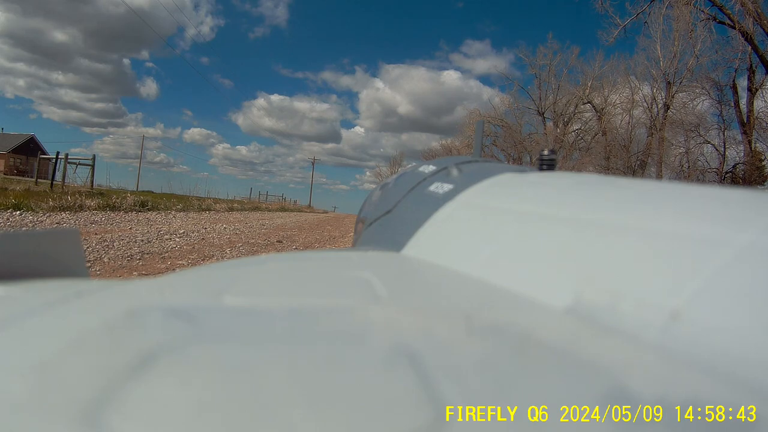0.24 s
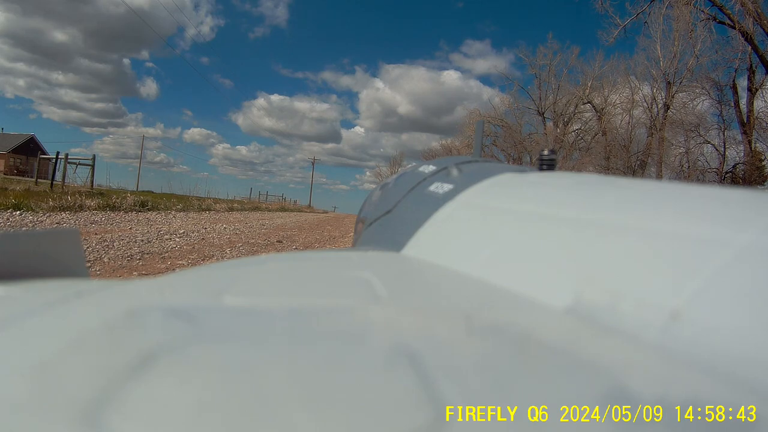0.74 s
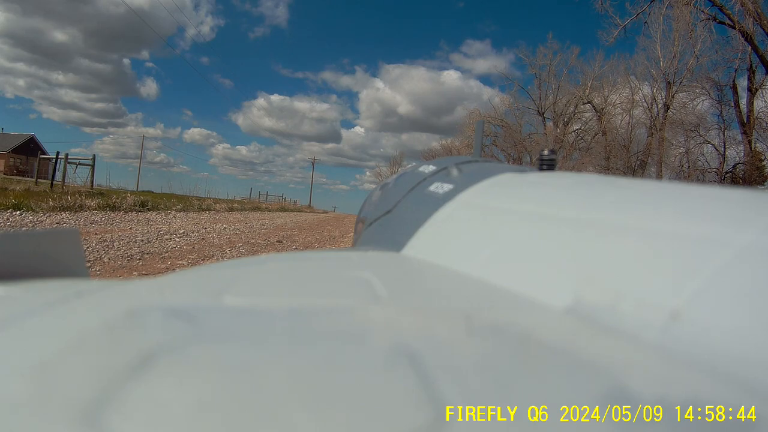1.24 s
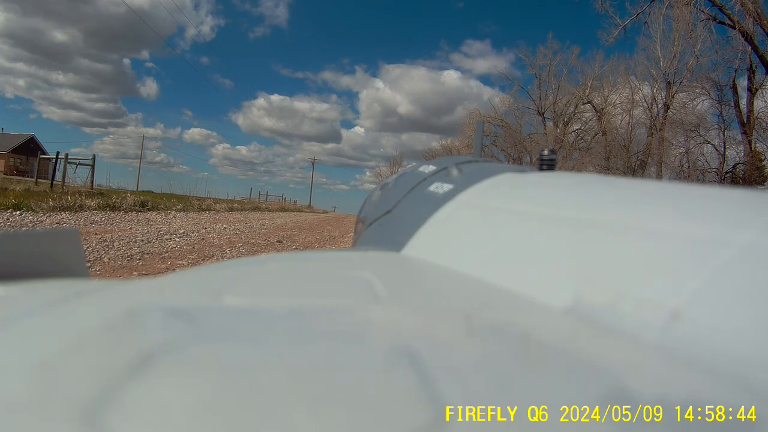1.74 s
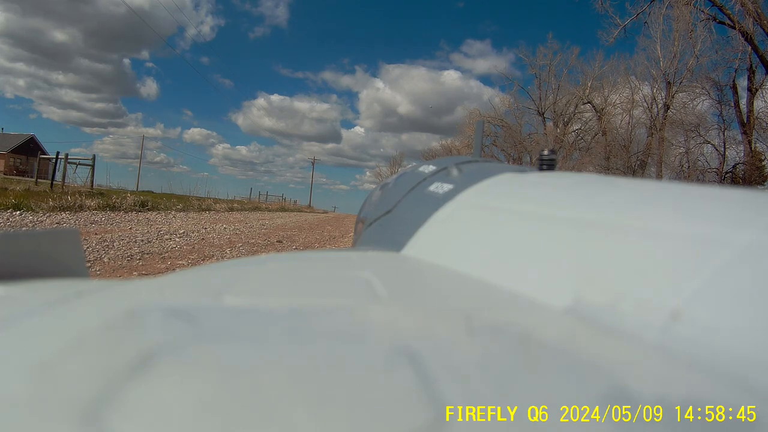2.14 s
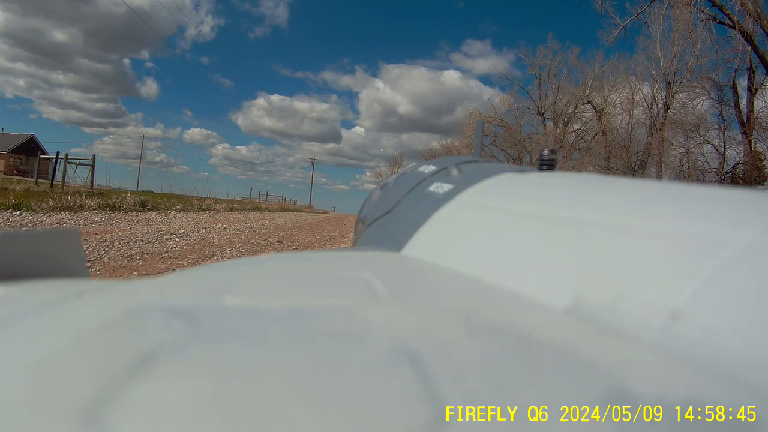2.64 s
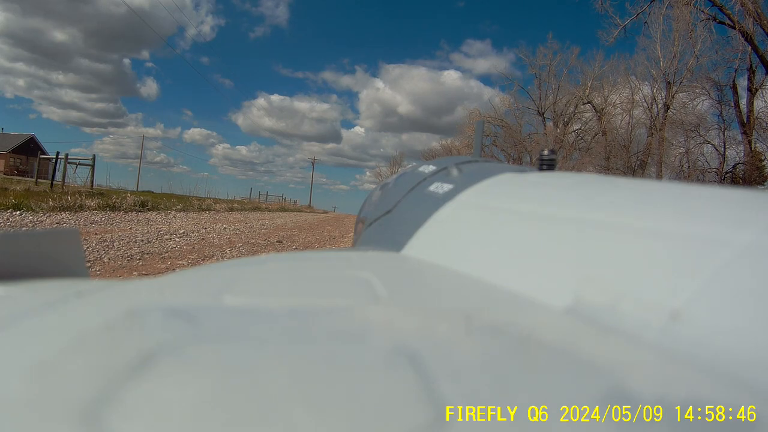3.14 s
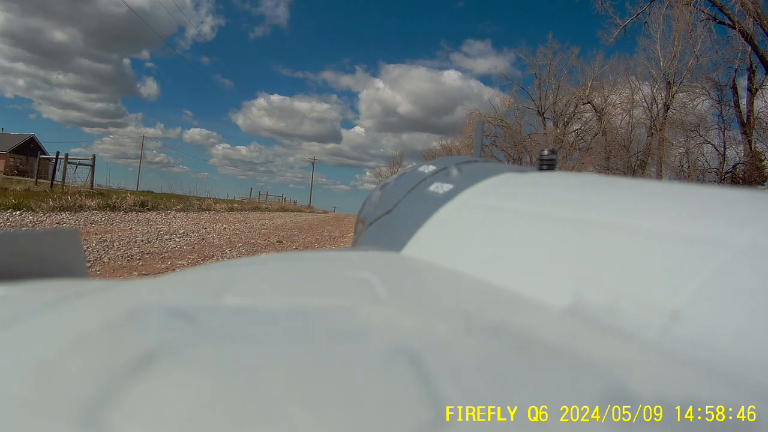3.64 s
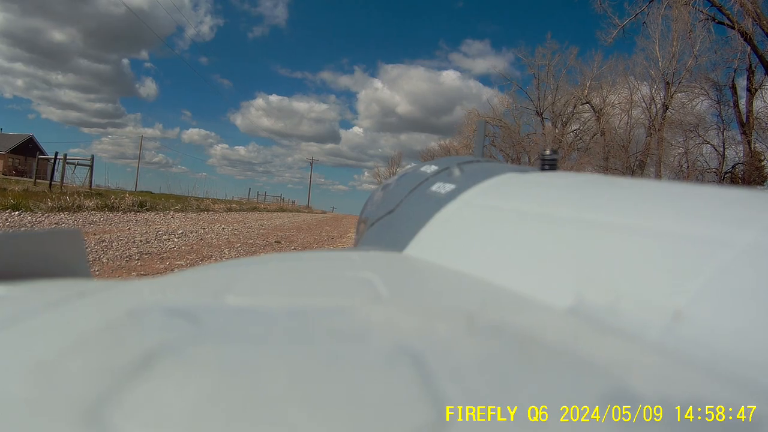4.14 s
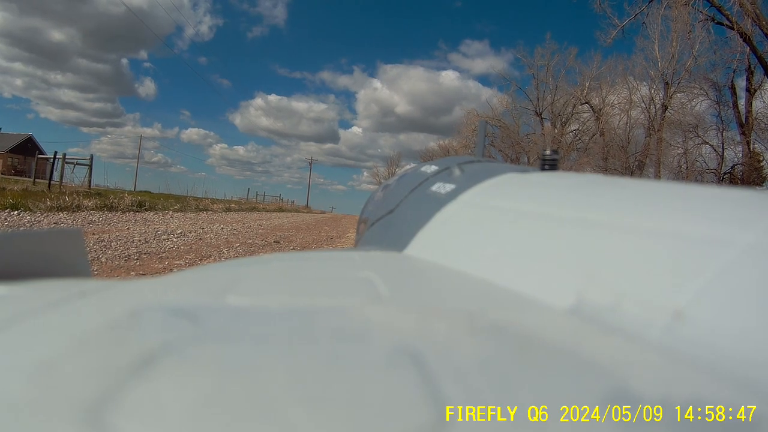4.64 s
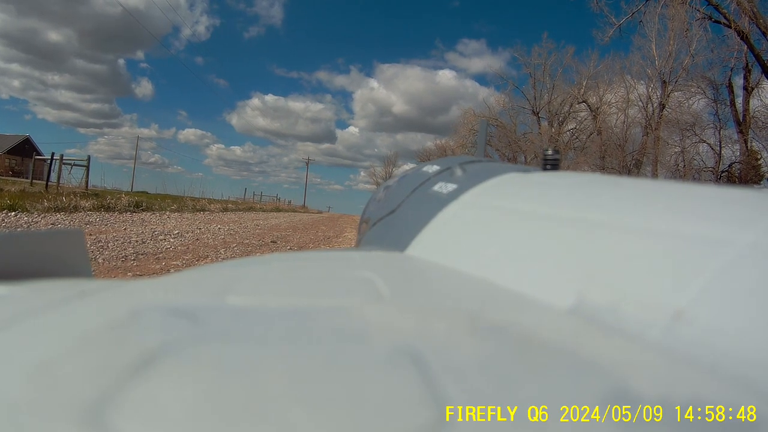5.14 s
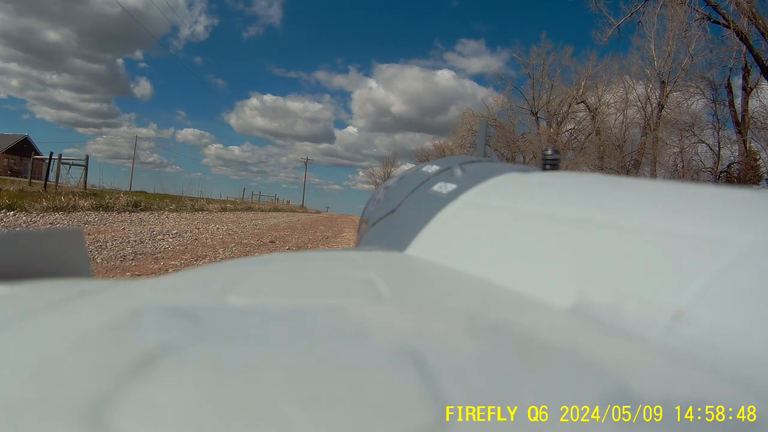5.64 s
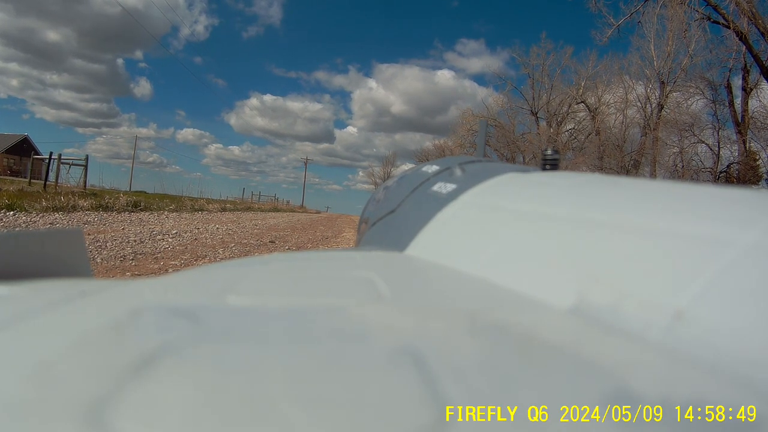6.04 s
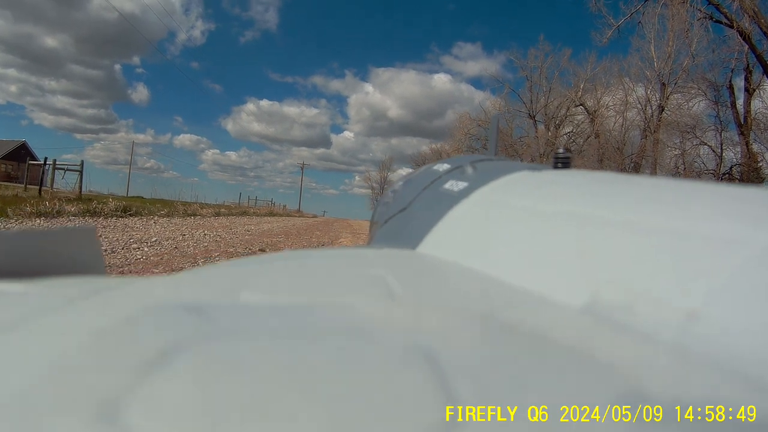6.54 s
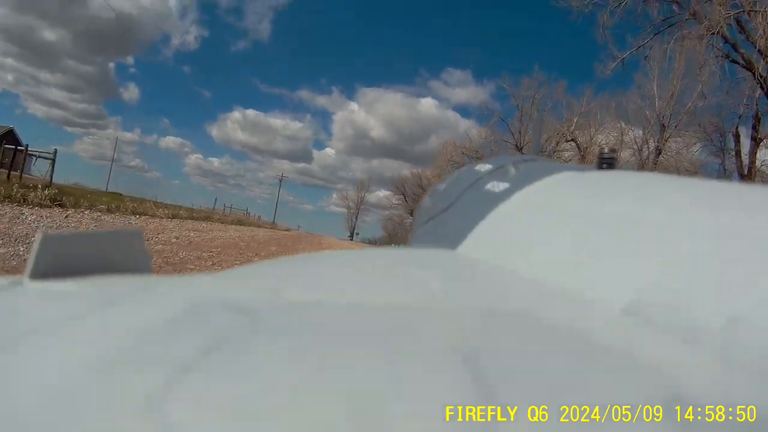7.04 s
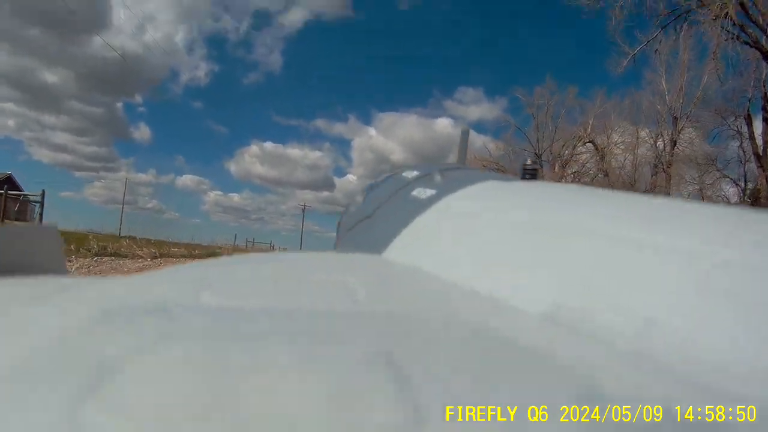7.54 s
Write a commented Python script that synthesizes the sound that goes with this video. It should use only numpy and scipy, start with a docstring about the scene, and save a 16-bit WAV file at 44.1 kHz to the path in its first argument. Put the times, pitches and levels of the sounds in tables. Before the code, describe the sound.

From 0 to 4 s there is only a very faint steady breeze and distant birds: weak rasping calls early, a soft rustle at 0.75 s, gliding whistles from 1.5 s, a quick slowing trill around 2.6-3 s, and two harsh chirps near 3.6 and 3.8 s. At 4.1-4.5 s small servos buzz in short gritty bursts. At 4.46 s twitches become a rapid stutter of hard knocks ringing in the airframe, and an electric fan spools up in about half a second. It holds a buzzy, hollow idle whine with airflow until 5.9 s, edges up, then surges from 6.2 to a loud shrill roar near 6.5 s. It drops to a hoarse part-throttle whine as wheels rumble, tick and jolt on gravel from 6.7 s, the close microphone squashing peaks. From 7.7 s the pitch falls, cut off still rolling.

```python
"""A gravel road among trees, with the camera's microphone riding on a model jet's fuselage.
Birds sing in gliding whistles and noisy chucks, with one soft rustle; servos rasp in short bursts of gear teeth.
Knocks ringing in the airframe start the brushless motor. Motor and twelve-blade fan tones follow one shaft
speed as the jet spools up, idles and goes to full throttle, with noise for the air in the duct.
It rolls off at part throttle on rumble, ticks and jolts that push the gain down and round off the peaks."""
import sys
import numpy as np
from scipy import signal
from scipy.fft import rfft, irfft, next_fast_len
from scipy.io import wavfile
from scipy.ndimage import uniform_filter1d, map_coordinates

SR = 44100
rng = np.random.default_rng(int(sys.argv[2]) if len(sys.argv) > 2 else 0)


def to_wav(s):
    """Save 16-bit WAV."""
    ch = np.atleast_2d(s).T  # columns
    pcm = np.round(np.clip(ch, -1, 1) * 32767)  # PCM
    wavfile.write(sys.argv[1], SR, pcm.astype(np.int16))


N = 343980


def amp(db):
    """Decibels to gain."""
    return 10 ** (np.asarray(db) / 20)


def unit(x):
    """Scale to rms 1."""
    return x / np.sqrt(np.mean(x ** 2) + 1e-20)


def curves(rows):
    """One value per sample for each column after the time."""
    s, *cols = np.transpose(rows)
    return [np.interp(np.arange(N) / SR, s, c) for c in cols]


def fade_in(start, length):
    """A straight ramp from 0 to 1, start and length in seconds."""
    return np.clip((np.arange(N) / SR - start) / length, 0, 1)


def wobble(rate):
    """A smooth random curve with rate knots a second."""
    knots = rng.standard_normal(int(N * rate / SR) + 4)
    return map_coordinates(knots, [np.arange(N) * rate / SR])


def filtered(x, response):
    """x times a response of frequency."""
    size = next_fast_len(len(x) + 8192)
    return irfft(rfft(x, size) * response(np.fft.rfftfreq(size, 1 / SR)), size)[:len(x)]


def coloured(x, spectrum):
    """x shaped by (Hz, dB) points on a log axis."""
    f, db = np.transpose(spectrum)
    return filtered(x, lambda hz: amp(np.interp(np.log(hz + 1), np.log(f), db)))


def noise(spectrum):
    """Coloured noise of rms 1."""
    return unit(coloured(rng.standard_normal(N), spectrum))


def add(track, s, sound):
    """Mix a sound into a track at time s."""
    start = max(round(s * SR), 0)
    track[start:start + len(sound)] += sound[:max(N - start, 0)]


def boost(hz, resonances):
    """Lift in dB from a set of (Hz, width Hz, dB) resonances."""
    return sum(db / (1 + (2 * (hz - c) / w) ** 2) for c, w, db in resonances)


def tone(cycles, flutter_db, rough):
    """A line of about rms 1, its strength (dB) and phase (radians) shaken at random."""
    strength = np.sqrt(2) * amp(flutter_db * wobble(22))
    return strength * np.sin(2 * np.pi * cycles + rough * wobble(160))


def octaves(speed):
    """Shaft speed in octaves above 500 turns a second, the part-throttle speed."""
    return np.log2(np.maximum(speed, 20) / 500)


def shaft():
    """Shaft speed in turns a second: the rotor lags behind each move of the throttle."""
    # Each row: start in seconds, speed aimed at in turns a second, lag in seconds,
    # ease (about 1 = stick snapped, 2 to 3 = pushed smoothly).
    throttle = [(4.525, 279.6, .133, .854), (5.94, 323.6, .166, 1.04), (6.199, 675.2, .123, 2.62),
                (6.635, 471.8, .151, 2.73), (7.062, 520.8, .098, 2), (7.313, 509.2, .069, 2),
                (7.674, 213, .164, .96)]
    t, speed = np.arange(N) / SR, np.zeros(N)
    for s, aim, lag, ease in throttle:
        progress = 1 - np.exp(-(np.maximum(t - s, 0) / lag) ** ease)
        speed += (aim - speed) * progress
    return speed


def fan(turns, speed, load):
    """Unbalance hums once a turn; the blades whine twelve times a turn, hoarser at speed. Both flare at resonances."""
    # Motor mount resonances that the hum sweeps through. Each row: centre in Hz, width in Hz, boost in dB.
    mount = [(240, 49, 12), (309, 26, 10), (634, 210, 4)]
    # Intake resonances that the whine sweeps through. Each row: centre in Hz, width in Hz, boost in dB.
    intake = [(1850, 230, 4), (2630, 168, 13.5), (3283, 400, 13.5), (3690, 190, 8.5), (4010, 305, 25),
              (5130, 480, 13), (7560, 1300, 16)]
    blade_passes, blade_hz = 12 * turns, 12 * speed

    # the hum grows 14 dB per octave of speed; load lifts both tones, coasting lowers them
    hum_db = -27.5 + 14 * octaves(speed) + boost(speed, mount) + 6 * load
    blade_db = -37 + boost(blade_hz, intake) + 8.5 * np.maximum(load, -0.45)
    turbulence = np.interp(speed, [330, 600], [0.15, 0.45])

    hum = amp(hum_db) * tone(turns, flutter_db=0.5, rough=0.034)
    whine = amp(blade_db) * tone(blade_passes, flutter_db=7.7 * turbulence, rough=turbulence)
    octave = amp(blade_db - 21) * tone(2 * blade_passes, flutter_db=2, rough=turbulence)
    octave *= fade_in(6.2, 0.18)
    return (hum + whine + octave) * fade_in(4.57, 0.056)


def motor(turns, speed, load):
    """Eighteen commutations a turn shake the airframe and beat against the chopped supply."""
    # Motor lines. Each row: multiple of the chopping rate, multiple of the shaft speed to add to it.
    mixes = [(0, 6), (0, 9), (0, 24), (1, 0), (1, 18), (1, -18), (2, -54), (0, 2), (0, 3)]
    # Relative level of each of those lines in dB.
    mix_db = [-29, -33.5, -38, -49, -51.5, -39, -36.5, -50, -40]
    # Relative strength of the chopping, fading toward full throttle. Each row: turns a second, dB.
    chopping = [(5, 5), (110, -4.5), (278, -3), (305, 3), (360, -5), (470, -15), (520, -20), (675, -24)]
    chops = 8007 * np.arange(N) / SR  # chopping rate in Hz, times seconds
    steps = 18 * turns

    lines = np.zeros(N)
    for (carrier, order), db in zip(mixes, mix_db):
        if order < 0:
            # the lower beats ring fully once the drive has locked, and die as the throttle opens
            presence = fade_in(4.68, 0.27) * (1 - fade_in(5.92, 0.11))
        else:
            presence = fade_in(4.4, 0.29)
        lines += amp(db) * presence * tone(carrier * chops + order * turns, flutter_db=2.5, rough=0.27)
    lines *= amp(np.interp(speed, [150, 220, 262], [-1, 2.5, 0]))  # spooling up takes extra torque
    lines = filtered(lines, lambda hz: hz ** 4 / (hz ** 4 + 480 ** 4))  # the small motor radiates no bass

    ripple = amp(-13) * tone(steps, flutter_db=-1.5, rough=0.13) * fade_in(4.525, 0.024)
    beat = amp(-24.5) * tone(chops - 2 * steps, flutter_db=1.5, rough=0.16) * fade_in(4.6, 0.11)
    shaking = filtered(ripple + beat, airframe)
    # hard acceleration makes the ripple heard directly
    zip_up = amp(-15.5) * ripple * (1 - fade_in(4.66, 0.16))

    squeal = amp(-36.5) * tone(chops - steps / 2, flutter_db=5, rough=1.3)
    squeal *= fade_in(4.46, 0.083) * (1 - fade_in(4.55, 0.06))
    # a brief line whose pitch rises with the spool-up
    upper_beat = amp(-39) * tone(chops + steps, flutter_db=5, rough=0.9)
    upper_beat *= fade_in(4.55, 0.022) * (1 - fade_in(4.514, 0.17))

    current_db = np.interp(speed, *np.transpose(chopping)) + 3.8 * load
    return amp(current_db) * (lines + shaking + zip_up + squeal + upper_beat)


def airframe(hz):
    """Ringing response of the fuselage: a sum of resonant modes of alternating sign."""
    # Each row: centre in Hz, width in Hz, level in dB.
    modes = [(307, 28, -10), (598, 79, 1), (933, 102, -4), (1156, 75, -1), (2007, 103, 1), (3020, 92, -18),
             (3980, 90, -6)]
    response = 0
    for k, (c, w, db) in enumerate(modes):
        response = response + (-1) ** k * amp(db) * 1j * hz * w / (c * c - hz * hz + 1j * hz * w)
    return response


def airflow(speed, load):
    """Air rushes through the duct, louder with speed; faster flow damps its resonances and turns to a roar."""
    # Spectra of smooth and turbulent air, and of the hiss. Each row: frequency in Hz, relative level in dB.
    slow_spectrum = [(40, -37), (130, -15.5), (230, -14.5), (350, 1.5), (520, -4), (720, -6.5), (1300, -2),
                     (2000, 1.5), (2350, -2), (3700, 2), (4600, -4), (5300, -4.5), (6000, -12.5),
                     (9000, -38)]
    fast_spectrum = [(40, -33), (130, -24), (300, -3), (600, -2), (1000, -1), (1400, 3.5), (1700, -1.5),
                     (2100, 5.5), (2700, -1), (3200, -3), (4000, -2.5), (5400, -8.5), (6300, -10.5),
                     (9000, -40)]
    hiss_spectrum = [(2500, -45), (5200, -6), (6300, -7), (7200, 3.5), (8100, 1.5), (9200, -0.5),
                     (10500, -6), (11800, -10.5), (13200, -10.5), (14800, -12), (15700, -18)]
    fast = np.clip((speed - 310) / 190, 0, 1)  # 0 = smooth flow, 1 = turbulent
    rise = octaves(speed)

    slow_air = unit(filtered(noise(slow_spectrum), lambda hz: duct(hz, depth=0.98)))
    fast_air = unit(filtered(noise(fast_spectrum), lambda hz: duct(hz, depth=0.34)))
    # each level: dB at part-throttle speed, plus dB per octave of speed
    slow_rush = (1 - fast) * amp(-11.5 + 10.5 * rise) * slow_air
    fast_rush = np.sqrt(fast) * amp(-19.5 + 11.5 * rise) * fast_air
    hiss_db = (1 - fast) * (-23.5 + 11.5 * rise) + fast * (-30 + 18.5 * rise)

    rush = amp(0.52 * wobble(35)) * (slow_rush + fast_rush)
    hiss = amp(hiss_db + 0.82 * wobble(45)) * noise(hiss_spectrum)
    # more air while the fan is driven, less while it coasts
    return amp(3.5 * load) * (rush + hiss) * fade_in(4.49, 0.044)


def duct(hz, depth):
    """Gain of the duct's resonances, their boosts scaled by depth."""
    # Each row: centre in Hz, width in Hz, boost in dB at depth 1.
    resonances = [(582, 88, 11.5), (966, 130, 7.5), (1850, 270, 3.5), (2660, 285, 9), (3340, 210, 4.5),
                  (4108, 247, 12)]
    return amp(depth * boost(hz, resonances))


def starting_kicks(count=10):
    """The rotor twitches, then stutters harder up to a limit; each jerk knocks the airframe."""
    # First twitches. Each row: start in seconds, peak of the airframe's ring in dB.
    twitches = [(4.461, -18), (4.474, -15.5)]
    blows, t = np.zeros(N), np.arange(SR // 20) / SR
    # kicks about 5.2 ms apart, swelling 620 dB a second from -15 dB to at most 0.5 dB
    delays = 0.0052 * (np.arange(count) + 0.15 * rng.standard_normal(count))
    stutter = [(4.492 + d, min(-15 + 620 * d, 0.5)) for d in delays]
    for s, db in twitches + stutter:
        crack = rng.standard_normal(len(t)) * amp(-60 * t / 0.019)
        ring = filtered(np.exp(-t / 0.00024) * (1 + 0.8 * crack), airframe)
        # the hardest kicks rock the whole jet
        push = amp(db / 2 - 18.5) * np.sin(2 * np.pi * 105 * t) * np.exp(-t / 0.006)
        add(blows, s, amp(db) * (ring / np.abs(ring).max() + 0.05 * crack + push))
    return filtered(blows, lambda hz: 1 / (1 + (hz / 11000) ** 4))


def wheels():
    """Gravel rumbles and ticks under the wheels; each jolt is a short shower of knocks and a low thump."""
    # Rumble of the rolling wheels, growing with ground speed and lighter once the wings take the load. Each
    # row: time in seconds, rumble level in dB.
    rumble_level = [(6.26, -51), (6.54, -22.5), (6.73, -31), (6.79, -20), (7.07, -23), (7.15, -25.5),
                    (7.8, -28.5)]
    # Wheel jolts. Each row: start in seconds, relative force in dB, decay scale in seconds.
    jolts = [(6.682, 0.5, 0.013), (6.846, -4.5, 0.011), (6.883, -6.5, 0.019), (6.932, -6, 0.01),
             (6.955, -6.5, .01), (6.994, 7, 0.0084), (7.019, -2, 0.031), (7.07, 5, .026),
             (7.271, -3, 0.044), (7.334, -4.5, 0.0095), (7.399, -4.5, 0.023), (7.422, -4, 0.033),
             (7.458, 3, 0.013), (7.478, -4, 0.0091), (7.534, 3, 0.032), (7.665, 4, 0.027),
             (7.728, -3.5, 0.02)]
    # Spectra of the rumble and of the stones. Each row: frequency in Hz, relative level in dB.
    rumble_spectrum = [(20, -9), (45, -4.5), (80, 2.5), (115, 2), (190, -8), (300, -3), (600, -1.5),
                       (1500, -11), (4000, -45)]
    clatter_spectrum = [(40, -29), (120, -6.5), (300, 2.5), (600, 0), (1000, 1.5), (1700, -0.5),
                        (2400, -8.5), (3300, -21), (6000, -13), (15000, -54)]
    rolling = amp(curves(rumble_level)[0] + 1.51 * wobble(50)) * fade_in(6.2, 0.11)

    force = np.zeros(N)
    for s, db, length in jolts:
        u = np.arange(SR // 8) / SR / max(length, 0.004)
        add(force, s, amp(db) * (1 - np.exp(-u * 12)) * np.exp(-u * u * 1.42))
    # the landing gear's low answer to a jolt lingers with a 22 ms time constant
    keep = np.exp(-1 / (0.022 * SR))
    thump = amp(-11.5) * signal.lfilter([1 - keep], [1, -keep], force)

    pebbles = rolling * amp(-8 + 5.6 * wobble(60))
    stones = rng.standard_normal(N) * (rng.random(N) < 2200 / SR)  # about 2200 ticks a second
    clatter = (amp(-7.5) * force + pebbles) * unit(coloured(stones, clatter_spectrum))
    return np.hypot(rolling, thump) * noise(rumble_spectrum) + clatter


def servos():
    """Each move is a burst of gear rasp whose tooth rate rises and falls."""
    # Each row: start in seconds, length in seconds, level in dB before the echo,
    # nominal tooth rate in Hz (the move runs at 0.73 to 0.93 of it), brightness tilt in dB per octave.
    moves = [(4.123, 0.046, -65, 710, -2), (4.159, 0.069, -47.5, 568, -3.5), (4.228, 0.1, -60.5, 513, -8.5),
             (4.302, .025, -58, 700, -4.5), (4.319, .027, -42, 803, 0.5), (4.365, 0.028, -37, 796, 0.5),
             (4.385, 0.025, -44, 697, -1.5), (4.405, .06, -45.5, 680, 0), (4.454, 0.044, -38.5, 682, -5.5)]
    # Spectrum of the gears. Each row: frequency in Hz, relative level in dB.
    gear_spectrum = [(120, -30), (200, -11), (503, -8.5), (624, -6), (761, -14), (849, -5.5), (2090, -12.5),
                     (2900, -5), (3670, -8), (4010, 3.5), (4810, -17.5), (6900, -10), (10100, -28),
                     (13000, -37), (15000, -43)]
    out = np.zeros(N)
    for s, length, db, tooth_hz, tilt_db in moves:
        u = np.linspace(0, 1, max(int(length * SR), 64))
        pace = 0.73 + 0.2 * np.sin(np.pi * u) + 0.0065 * wobble(450)[:len(u)]
        teeth = np.cumsum(tooth_hz * pace) / SR
        mesh = sum(np.sin(2 * np.pi * (k * teeth + rng.random())) for k in range(5, 13))
        rasp = 0.56 * unit(mesh) + 1.4 * rng.standard_normal(N)[:len(u)]
        shaped = np.pad(rasp * signal.windows.tukey(len(u), 0.5), (0, 1024))  # room for the ring
        burst = coloured(shaped, gear_spectrum)
        tilted = filtered(burst, lambda hz: amp(tilt_db * np.log2(hz / 3000 + 0.16)))
        add(out, s, amp(db) * unit(tilted))
    return out + amp(-13) * echo(out, t60=0.13)


def birds(count=12):
    """Whistles, a swelling, slowing trill, harsh chirps, faint calls and a rustle, scattered by the trees."""
    # Song notes. Each row: start in seconds, length in seconds, start, middle and end pitch in Hz,
    # level in dB before the trees scatter it.
    notes = [(1.54, 0.073, 3350, 3400, 3300, -79), (1.63, .085, 2850, 2700, 1950, -76),
             (2.101, .055, 1180, 1290, 1500, -68), (2.164, .047, 4650, 3900, 3000, -69),
             (2.22, .055, 3030, 2940, 2650, -68), (2.287, 0.035, 2750, 2740, 2200, -62.5),
             (2.438, 0.083, 1870, 1830, 2100, -64), (2.495, .045, 4200, 3450, 3050, -75),
             (2.55, 0.054, 3100, 3060, 2480, -58.5), (3.019, .042, 3400, 4650, 4800, -58.5),
             (3.056, .085, 2590, 1820, 1790, -58.5)]
    # Two rising whistles and two quick falls of one chirp. Each row: delay in seconds, length in seconds,
    # start, middle and end pitch in Hz, level in dB relative to the chirp.
    chirp_parts = [(0, 0.039, 3270, 3460, 3820, -9.5), (0, 0.063, 3970, 4400, 4650, -0.5),
                   (0.034, .027, 5000, 2700, 1500, -3), (0.048, .036, 3690, 2290, 1500, -8.5)]
    # Chirps. Each row: time in seconds, level in dB before the trees scatter it.
    chirps = [(3.586, -55.5), (3.758, -55.5)]
    # Harsh, faint calls far off, and one longer, lower rustle at 0.75 s. Each row: start in seconds,
    # length in seconds, level in dB before the trees scatter it, centre in Hz.
    far_rasps = [(.003, 0.03, -63.5, 2900), (0.136, 0.034, -64, 2800), (0.31, 0.03, -64.5, 2700),
                 (.75, 0.1, -73, 1600), (2.568, 0.021, -64, 3500)]
    song = np.zeros(N)
    for s, length, start_hz, middle_hz, end_hz, db in notes:
        add(song, s, amp(db) * whistle(length, start_hz, middle_hz, end_hz))

    for k in range(count):
        # trill: first gap about 25.5 ms, each later gap 1.04 ms longer
        s = 2.644 + 0.0255 * k + 0.00104 * k * k / 2
        pitch = 1 + 0.039 * rng.standard_normal(3)
        loudness = amp(min(-61.5 + k, -56.5) + rng.normal(0, 1.8))
        add(song, s + 0.006, loudness * whistle(0.015, *(pitch * [2800, 2560, 2540])))
        add(song, s - 0.004, loudness * amp(-7) * whistle(0.015, *(pitch * [3300, 3300, 3100])))

    for s, db in chirps:
        for delay, length, start_hz, middle_hz, end_hz, part_db in chirp_parts:
            add(song, s + delay, amp(db + part_db) * whistle(length, start_hz, middle_hz, end_hz))
        add(song, s - 0.008, amp(db - 9) * rasp_note(0.019, centre_hz=4860))  # a chirp opens with a tick
        add(song, s + 0.027, amp(db - 4) * rasp_note(0.04, centre_hz=4200))  # and rasps where it breaks

    for s, length, db, centre_hz in far_rasps:
        add(song, s, amp(db) * rasp_note(length, centre_hz))
    near_trunk = np.roll(song, round(0.013 * SR))  # one reflection, 13 ms late
    return amp(-1.5) * song + amp(-12) * near_trunk + amp(-5.5) * echo(song, t60=0.32)


def whistle(length, start_hz, middle_hz, end_hz):
    """One gliding bird note with a quaver and a weak octave."""
    u = np.linspace(0, 1, max(int(length * SR), 64))
    hz = np.polyval(np.polyfit([0, 0.5, 1], [start_hz, middle_hz, end_hz], 2), u)
    phase = 2 * np.pi * np.cumsum(hz * (1 + 0.025 * wobble(405)[:len(u)])) / SR
    wave = np.sin(phase) + 0.052 * np.sin(2 * phase)
    return np.sqrt(2) * signal.windows.tukey(len(u), 0.5) * wave


def rasp_note(length, centre_hz):
    """One harsh call or rustle: a burst of noise around one frequency."""
    hiss = rng.standard_normal(N)[:max(int(length * SR), 64)]
    harsh = unit(filtered(hiss, lambda hz: 1 / (1 + (np.log2((hz + 1) / centre_hz) / 0.41) ** 2)))
    return harsh * signal.windows.tukey(len(hiss), 0.7)


def echo(x, t60):
    """Diffuse answer of the ground and the trees: a noise tail falling 60 dB in t60 seconds."""
    t = np.arange(SR // 2) / SR
    tail = rng.standard_normal(len(t)) * amp(-60 * t / t60) * (1 - np.exp(-t / 0.0068))
    return signal.fftconvolve(x, tail / np.linalg.norm(tail))[:N]


def breeze():
    """Faint, steady outdoor air: low-weighted noise at -66 dB rms."""
    # Each row: frequency in Hz, relative level in dB.
    outdoor_spectrum = [(12, -35), (20, -1), (137, -4.5), (213, -6), (362, -8), (427, -12), (465, -9),
                        (505, -10), (1630, -20), (1920, -21), (3080, -24), (3350, -27), (15500, -33.5)]
    return amp(-66) * noise(outdoor_spectrum)


def scene():
    """Everything reaches one microphone on the fuselage, the same in both channels."""
    speed = shaft()
    # 1 = driven hard, -1 = coasting down; 1300 turns a second per second loads the motor heavily
    load = np.tanh(np.gradient(speed) * SR / 1300)
    turns = np.cumsum(speed * (1 + 0.00067 * wobble(18))) / SR
    powered = fan(turns, speed, load) + motor(turns, speed, load) + airflow(speed, load)
    jet = powered + starting_kicks() + wheels() + servos()
    return np.tile(jet + birds() + breeze(), (2, 1))


def record(dry):
    """The camera ducks at loud moments, recovers steadily, rounds off peaks and cuts above its band limit."""
    limit_db, recovery_db_per_s, top_hz = -7, 33, 15720  # threshold in dB rms
    level_db = 10 * np.log10(np.abs(uniform_filter1d(dry[0] ** 2, size=350)) + 1e-12)
    recovered = recovery_db_per_s * np.arange(N) / SR
    excess = np.maximum(level_db - limit_db, 0)
    # the reduction jumps up with the excess and falls back at the recovery rate
    reduction_db = np.maximum.accumulate(excess + recovered) - recovered
    ducked = dry * amp(-reduction_db)
    clipped = ducked / (1 + np.abs(ducked / 0.68) ** 6) ** (1 / 6)
    return np.array([filtered(channel, lambda hz: hz < top_hz) for channel in clipped])


dry = scene()
out = record(dry)
to_wav(out)
```